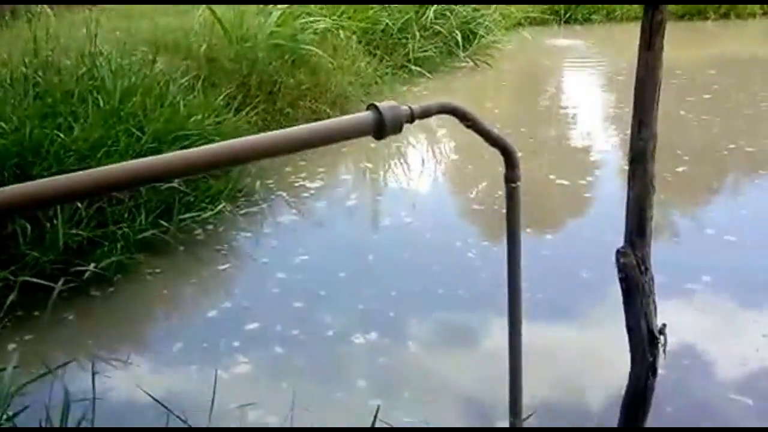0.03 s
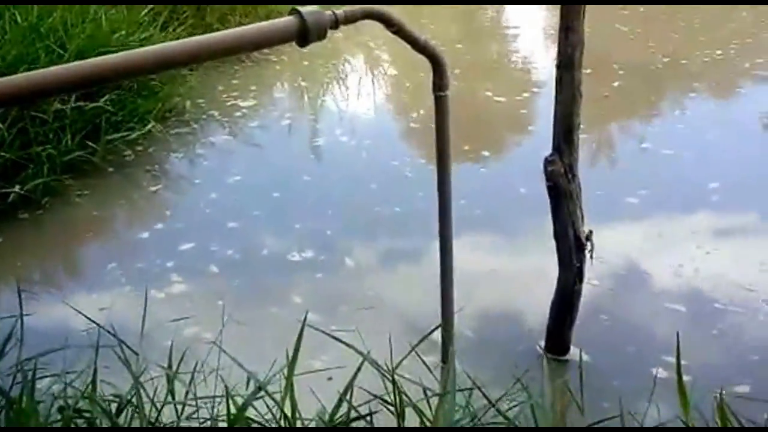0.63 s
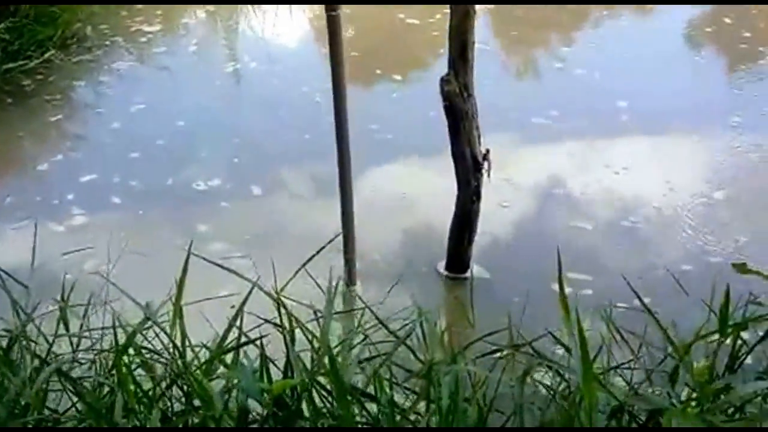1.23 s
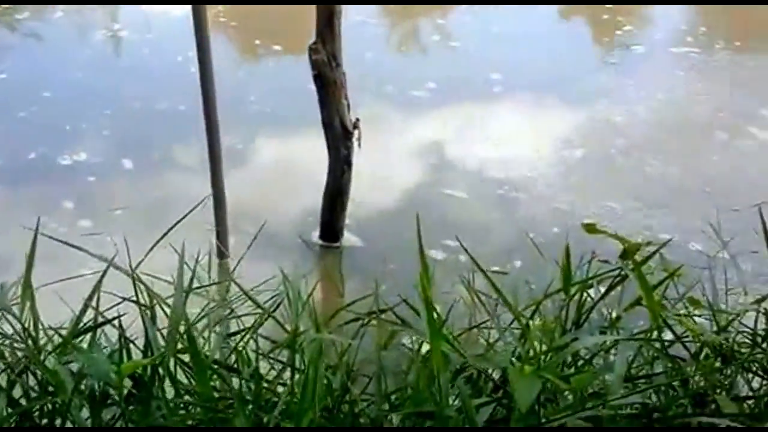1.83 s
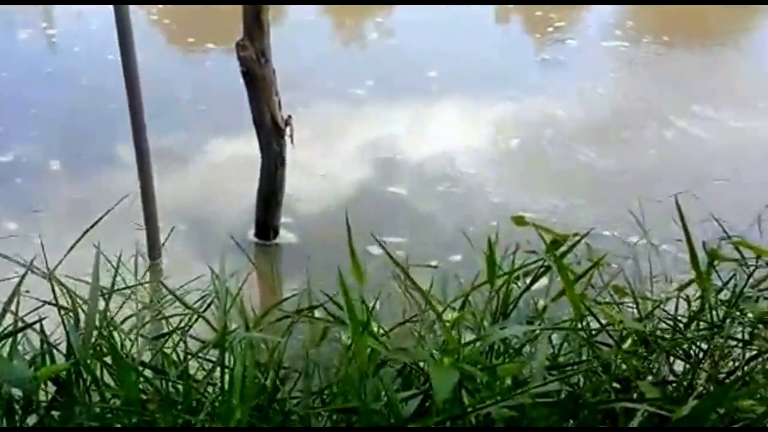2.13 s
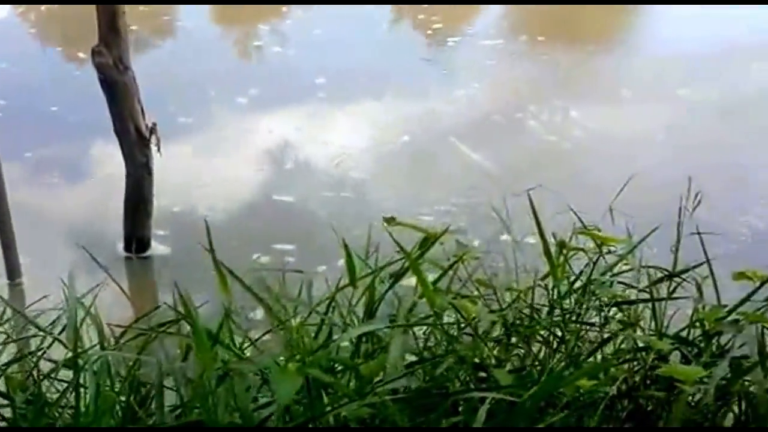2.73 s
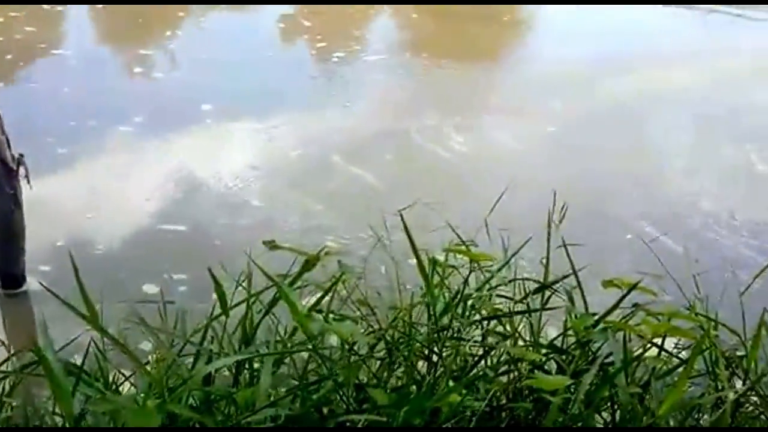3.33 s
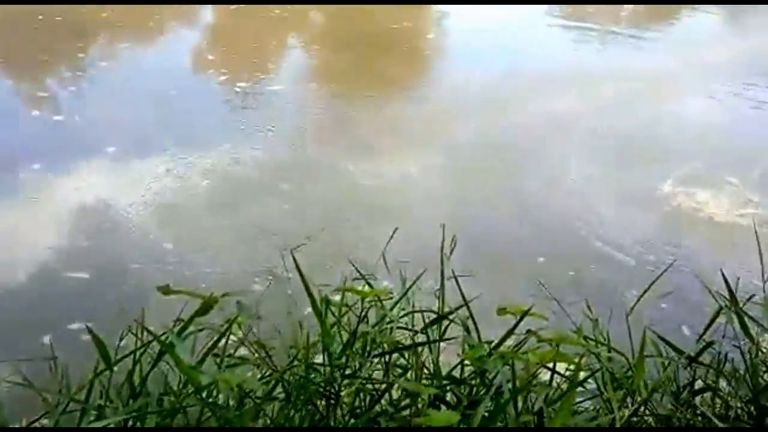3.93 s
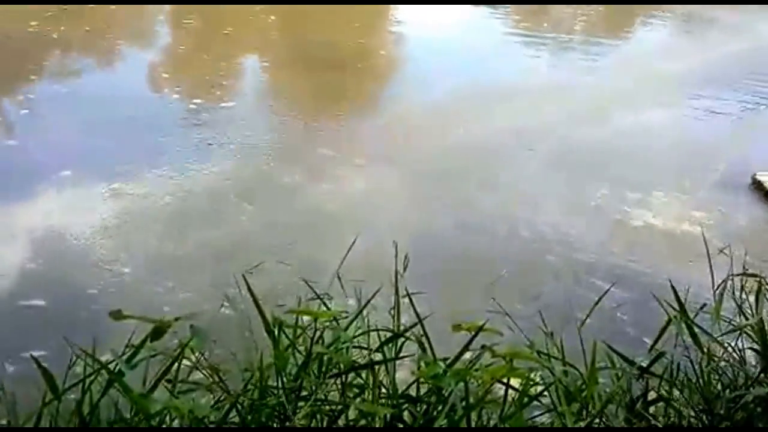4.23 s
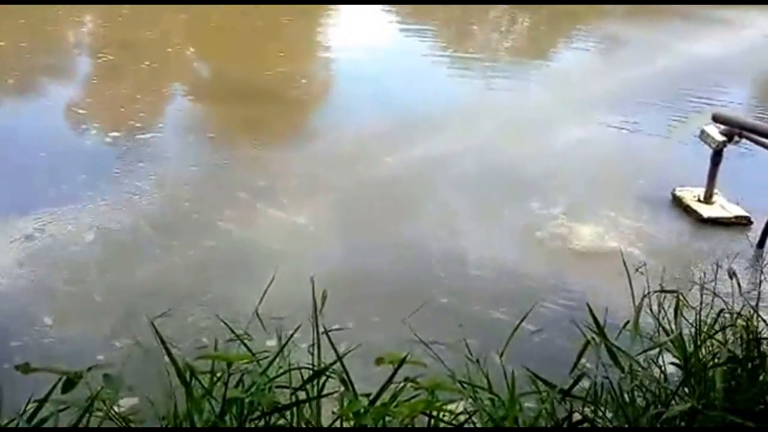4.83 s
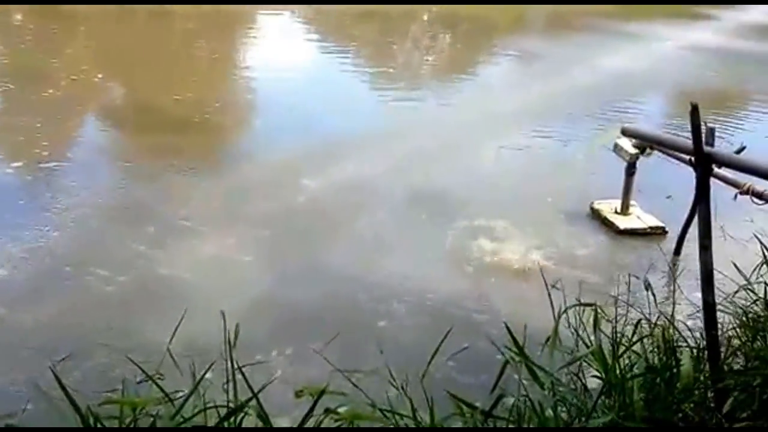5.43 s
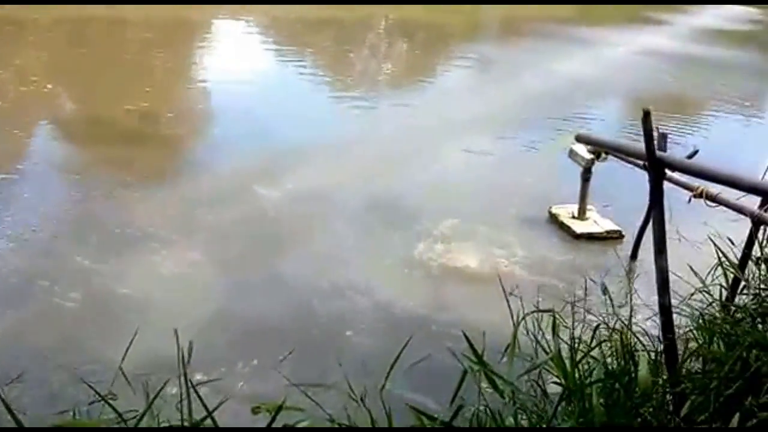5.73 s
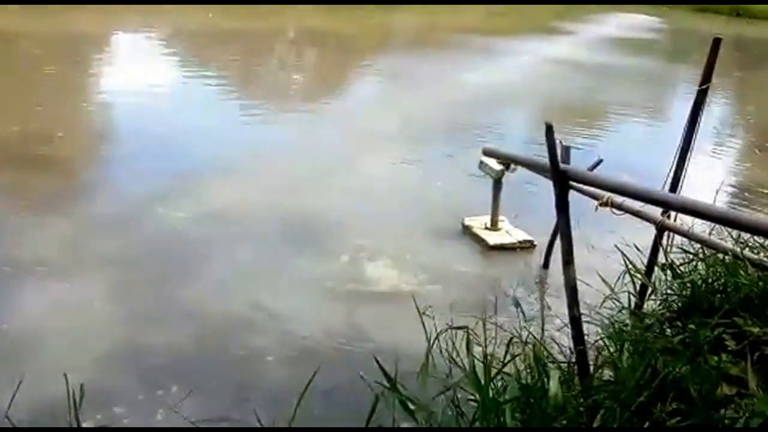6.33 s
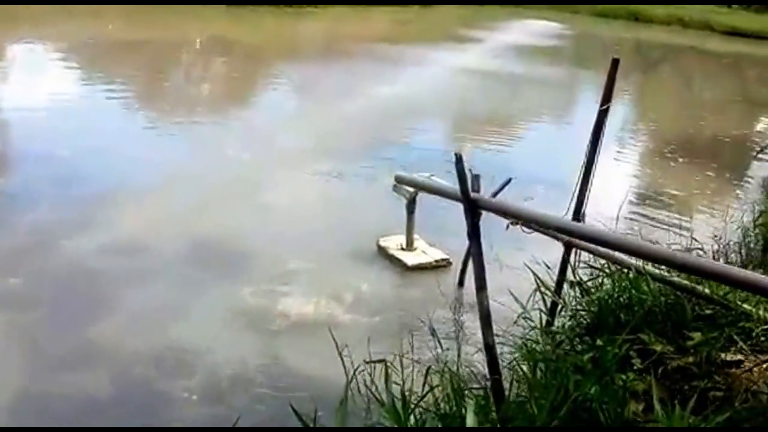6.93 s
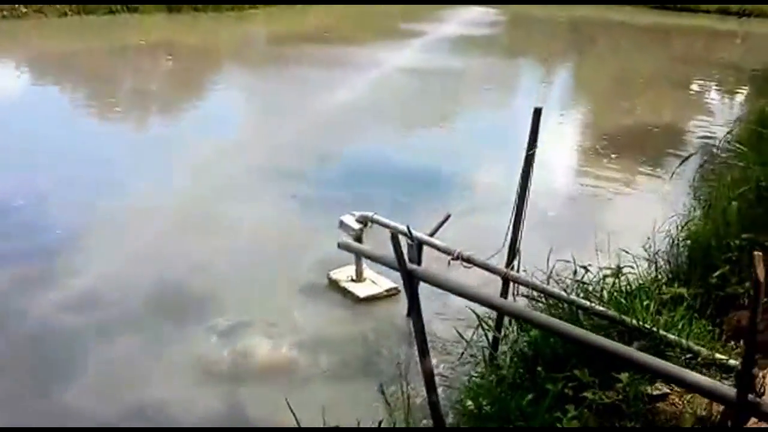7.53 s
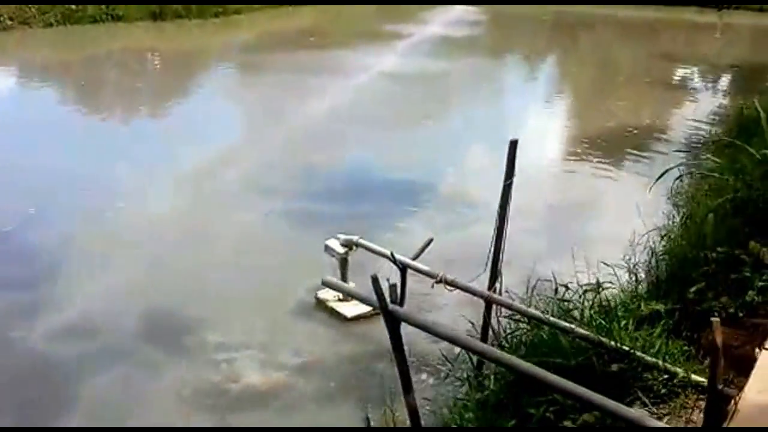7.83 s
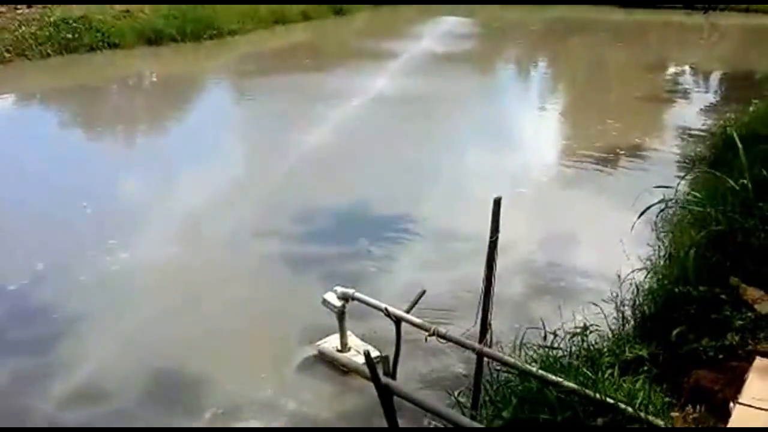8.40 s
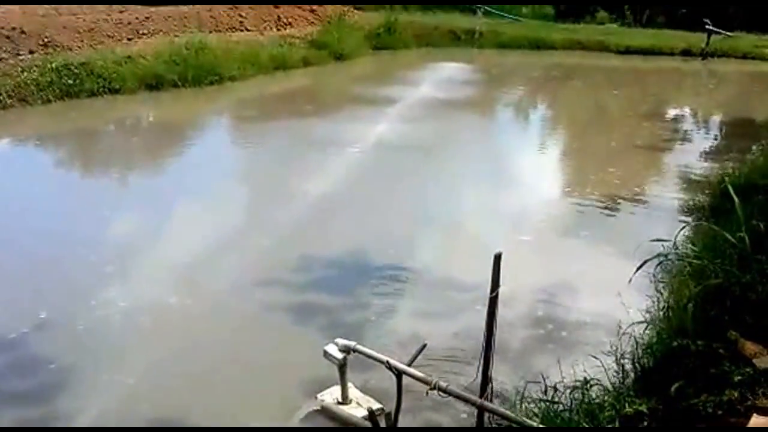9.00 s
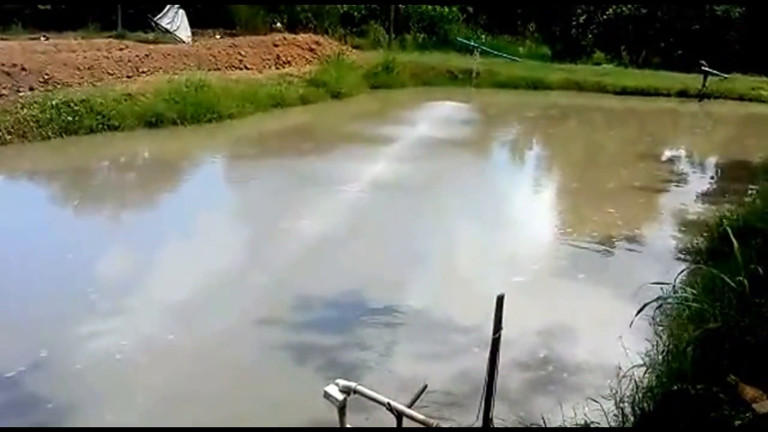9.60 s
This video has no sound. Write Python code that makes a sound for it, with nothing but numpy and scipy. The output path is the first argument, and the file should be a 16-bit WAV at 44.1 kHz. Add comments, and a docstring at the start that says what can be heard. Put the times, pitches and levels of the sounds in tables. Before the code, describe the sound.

A pump motor hums, whines and hisses beside a fish pond while its jet keeps the water gurgling and bubbling. Quick spatters of spray and scattered drops land throughout, with occasional plops and hollow swells. The microphone moves along the bank, so the water's tone slowly shifts: deep gurgling eases, fizz and splashing come forward, and the high whine dies away at the end while the low hum continues.

```python
"""An aerator's jet churns a fish pond: big bubbles gurgle and small ones wash and fizz, each
ringing briefly like a tiny bell. Spray spatters down, drops tick and slap, and a few bubbles plop.
The pump's motor hums and whines, and cooling air hisses through its cover.
The microphone pans along the bank, so sounds swell and fade and reflections slowly recolour the water."""
import sys
import numpy as np
from scipy import signal
from scipy.fft import rfft, irfft, next_fast_len
from scipy.io import wavfile
from scipy.ndimage import uniform_filter1d, map_coordinates

SR = 44100
rng = np.random.default_rng(int(sys.argv[2]) if len(sys.argv) > 2 else 0)


def dump_mix(stems):
    """Bounce the given channels to the path in sys.argv[1] as a 16-bit WAV at rate SR."""
    frames = np.atleast_2d(stems).T  # one column per channel
    limited = np.clip(frames, -1, 1)  # hard clip at full scale
    pcm = np.round(limited * 32767).astype(np.int16)
    wavfile.write(sys.argv[1], SR, pcm)


N = 426006

# Tone colours, or how strong each pitch is within a sound: pitch_hz, level_db
RUMBLE_COLOUR = [(25, -44), (45, -30), (57, -13.5), (85, -6.5), (115, -0.5), (165, 3), (215, 3), (320, -4),
                 (700, -43)]  # the jet's steady rumble
GURGLE_COLOUR = [(130, -58.5), (205, -13.5), (255, 0.7), (292, 0), (335, 0), (385, -1), (440, -4),
                 (600, -14.5), (1400, -48.5)]  # big bubbles
BOOM_COLOUR = [(260, -27.5), (288, -7), (300, 5), (309, 9), (322, 1.5), (338, -14), (380, -27.5)]  # a hollow resonance
BURBLE_COLOUR = [(250, -35.5), (380, -1.5), (520, 4.5), (610, 1), (690, 1.5), (780, -0.5), (900, -9),
                 (1400, -63)]  # medium bubbles
WASH_COLOUR = [(500, -35.5), (900, -5), (1250, -2.5), (1460, 2), (1630, -3), (1820, 1.5), (2050, -5),
               (2260, -2.5), (2650, -6.5), (3000, -12), (3500, -19.5), (4500, -19), (8000, -42)]  # small bubbles
PATCH_COLOUR = [(880, -11), (1050, 14), (1270, 22.5), (1430, 20), (1600, 21), (2000, -28)]  # one churning patch of water
JET_NOTE_COLOUR = [(1330, -19), (1430, -4), (1485, -2.5), (1540, -10), (1620, -22.5)]  # the jet's hollow note
SPRAY_COLOUR = [(2500, -12), (3700, -3), (4300, 7.5), (4750, 15), (5500, 5.5), (6500, -16), (7800, -11),
                (9400, -21), (11000, -27), (12800, -20), (14000, -28), (15500, -26)]  # droplets
FOAM_COLOUR = [(3000, -19), (4400, -4), (5200, 4.5), (6200, 3.5), (7200, -2.5), (8500, -12), (11000, -19.5),
               (12700, -9), (15000, -21)]  # fizzing foam
MIST_COLOUR = [(7500, -17), (9300, 3), (11000, -4), (13500, 2), (15000, -4)]  # the finest spray
TICK_COLOUR = [(3000, -19), (5500, 9), (8500, -5.5), (10000, -10.5), (11200, -23), (13000, -18),
               (14200, -18), (15300, -38)]  # a fine drop
SLAP_COLOUR = [(900, -9.5), (2400, 6), (3300, -2), (4300, -11), (6000, -10), (9000, -26)]  # a drop landing with a low slap
RASP_COLOUR = [(1950, -9.5), (2080, -5), (2170, -6), (2260, -3.5), (2400, -16)]  # roughness around the motor's whine
AIR_COLOUR = [(630, -24.5), (690, 4.5), (760, -1), (860, -7.5), (1600, -28), (1800, -8), (2000, -13),
              (3100, -32), (3600, -18.5), (4100, -25), (4450, -8.5), (4750, -15), (5100, -26)]  # air in the motor's cover

# How each sound grows and fades as the microphone pans: time_s, level_db
GURGLE_LEVELS = [(0, -32.5), (1.2, -33), (2.4, -31.5), (4.2, -37), (6.8, -36.5), (8.3, -39.5), (9.66, -39)]
BURBLE_LEVELS = [(0, -38), (1.1, -41), (2.5, -35), (6.7, -38.5), (8.2, -44), (9.66, -43.5)]
WASH_LEVELS = [(0, -35.5), (4.2, -37.5), (6.8, -37.5), (8.4, -38), (9.66, -42)]
SPRAY_LEVELS = [(0, -59), (1.9, -56.5), (4.6, -49.5), (7.3, -48), (9.66, -50)]
MIST_LEVELS = [(0, -82), (1.8, -84), (2.7, -68), (3.3, -67.5), (4.4, -69), (5.2, -74.5), (6.7, -74),
               (7.6, -72), (9.66, -76)]
WHINE_LEVELS = [(0.2, -45.5), (1.0, -43.5), (1.8, -46.5), (4.38, -47), (6.6, -45.5), (7.4, -49.5),
                (7.8, -57), (8.1, -51), (8.7, -55), (9.2, -72)]
OCTAVE_LEVELS = [(0, -59), (1.35, -55), (1.65, -62), (2.6, -61), (3.3, -70), (4.8, -65), (6.8, -66),
                 (7.5, -73)]  # the tone an octave above the whine

# Surges of churning that set the hollow resonance booming: time_s, level_db
BOOM_SURGES = [(0.05, -34.5), (1.3, -44), (1.9, -54), (4.6, -42), (5.82, -35.5), (7.92, -39)]
# The main clumps of spray landing: time_s, level_db, pitch_hz, length_s
SPRAY_CLUMPS = [(0.212, -39, 4600, 0.008), (0.385, -39, 4870, 0.006), (0.73, -42, 4500, 0.01),
                (1.233, -44, 5550, 0.008), (1.32, -40, 5216, 0.0066), (1.824, -39, 6010, 0.008),
                (1.962, -39, 5950, 0.0069), (1.988, -39, 5790, 0.006), (2.313, -38.5, 5285, 0.0069),
                (2.393, -41, 5240, 0.008), (2.533, -38, 4994, 0.008), (2.67, -38, 5380, 0.0059),
                (2.745, -38, 5070, 0.004), (2.835, -40, 5240, 0.009), (2.917, -40, 5100, 0.0083),
                (3.1, -39, 4992, 0.0091), (3.218, -34, 4886, 0.0057), (3.307, -35, 4850, 0.0058),
                (3.935, -34.9, 4660, 0.005), (3.965, -33, 5160, 0.0038), (4.394, -41, 4970, 0.008),
                (4.464, -34.5, 4650, 0.0055), (4.564, -35, 5027, 0.007), (4.885, -33.5, 4700, 0.0058),
                (5.051, -36, 5440, 0.008), (5.332, -35, 4840, 0.006), (5.449, -35.7, 4800, 0.007),
                (5.469, -32.3, 5010, 0.005), (5.565, -35, 4930, 0.0058), (5.664, -38, 4830, 0.011),
                (5.776, -34.5, 5230, 0.0083), (5.813, -37, 4890, 0.0039), (6.078, -34, 5040, 0.0043),
                (6.13, -32, 4960, 0.0043), (6.215, -34.9, 4750, 0.007), (6.378, -35.5, 4700, 0.0043),
                (6.422, -33, 4776, 0.0054), (6.611, -35, 4690, 0.005), (6.899, -36.5, 4960, 0.0055),
                (6.986, -34.7, 4759, 0.0047), (7.02, -38, 5120, 0.006), (7.093, -38, 4630, 0.01),
                (7.136, -34.5, 5200, 0.0063), (7.227, -39, 4840, 0.01), (7.32, -32.5, 4970, 0.0066),
                (7.589, -35.1, 4800, 0.0077), (7.777, -39.5, 4650, 0.0067), (7.881, -30, 4760, 0.0055),
                (7.96, -33, 4710, 0.011), (8.095, -35.4, 4750, 0.0055), (8.607, -39.5, 5270, 0.014),
                (8.995, -38, 5100, 0.005), (9.219, -38, 4930, 0.013), (9.329, -38, 5740, 0.006),
                (9.496, -40, 5130, 0.008)]
# The loudest ticking and slapping drops: start_s, level_db, brightness_db_per_octave
FINE_DROPS = [(0.212, -35, -12), (0.3172, -43, -2), (0.385, -40, -12), (0.6065, -41, -8), (0.73, -42, -11),
              (0.848, -42, -7), (0.9981, -40, -7), (1.231, -37, -7), (1.4769, -35, 6), (1.9106, -43, 2),
              (2.9168, -37.5, 8), (3.0969, -31, 2), (3.3712, -34, 3), (3.9719, -34, 5), (4.2248, -38, 10),
              (4.7351, -35, 2), (4.8394, -39, 2), (5.031, -34, -1), (5.244, -41, 11), (5.3263, -42, -2),
              (5.466, -35, -4), (5.6809, -36, 0), (6.3285, -40, 1), (6.349, -40, 2), (6.7555, -40, 2),
              (7.0913, -42, 0), (7.3173, -26.5, -2), (8.6128, -37, 3), (9.4948, -33, -4), (9.5711, -37, 6)]
SLAPPING_DROPS = [(0.2097, -31, -2), (0.381, -31, 1), (0.5586, -30.5, -1), (0.615, -32, 0), (0.7267, -28.5, 0),
                  (0.8429, -30, -1), (1.137, -31, -4), (1.1992, -29, -1.5), (1.91, -30, -2), (2.826, -34, -5),
                  (3.092, -29, -4), (5.041, -31.5, 2), (5.77, -28, 1.5), (7.615, -37, 1), (8.43, -36, -5),
                  (9.176, -33, -10), (9.57, -31, -8)]
# Single larger bubbles: start_s, level_db, pitch_hz, length_cycles, slap_strength
SINGLE_BUBBLES = [(1.136, -19, 417, 14, 0.38), (2.826, -19, 2370, 36, 0.3), (3.18, -21, 1510, 30, 0.5),
                  (4.496, -18, 1800, 18, 0.3), (4.4984, -15.5, 1660, 32, 0.15), (5.704, -21, 1775, 34, 0.5),
                  (5.77, -22, 1600, 30, 0.8), (6.003, -23, 970, 22, 0.5), (7.048, -25.5, 1010, 22, 0.85),
                  (7.171, -23, 1520, 31, 0.7), (7.3262, -16.5, 1300, 9, 0.7), (8.059, -25, 850, 25, 0.3),
                  (8.3, -29, 834, 22, 0.5), (8.475, -28, 680, 18, 0.5), (9.035, -15.5, 1650, 15, 0.15),
                  (9.0355, -25, 750, 7.7, 0.4), (9.049, -21, 1100, 13, 0.4), (9.057, -29, 900, 13, 0.8),
                  (9.176, -27.5, 880, 14, 0.81), (9.1918, -25.5, 960, 10, 0.9),
                  (9.211, -26.5, 1690, 30, 0.67), (9.627, -29, 790, 20, 0.57)]

# The motor's tones: pitch_hz, level_db
HUM_TONES = [(116.3, -0.5), (120.1, -8), (178, -11.5), (707.2, -12.5), (753.7, -17.5)]  # from the shaft and the mains power
SIDE_TONES = [(2084, -15), (2121.7, -34), (2199.1, -10.5), (2953.7, -33)]  # beside the whine, with levels relative to it
CASING_TONES = [(3794.2, -10), (3910, -12), (3992, -14), (4049.6, -3.5), (4167.5, -12), (4249, -9)]  # thin tones from the casing
# The whine sags slightly towards the end: time_s, pitch_hz
WHINE_PITCH = [(0, 2163.7), (2, 2163.3), (6.4, 2162.8), (7.7, 2160.3), (9.66, 2159.8)]

# Reflections whose paths keep changing: time_s, delay_ms, strength
NEAR_ECHO = [(0, 0.62, 0.27), (1.2, 0.42, 0.1), (2.3, 0.66, 0.2), (3.5, 0.36, 0.21), (5.2, 0.42, 0.14),
             (6.7, 0.47, 0.18), (7.3, 0.41, 0.28), (8.1, 0.73, 0.17), (9.66, 0.88, 0.3)]  # from close by
WATER_ECHO = [(0, 3.1, 0), (1.5, 2.11, 0.12), (2.4, 1.9704, 0.15), (3.5, 1.85, 0.12), (4.4, 1.8, 0.01),
              (5.2, 1.35, 0.1), (6.6, 1.26, 0.15), (7.5, 1.56, 0.02), (8.3, 1.92, 0), (9.2, 2.7, 0.03),
              (9.66, 2.34, 0.05)]  # off the pond's surface
# Two dips in the treble that slide as the microphone turns: time_s, centre_hz, depth_db
LOWER_TREBLE_DIP = [(0, 10500, 1.5), (1.5, 9300, 6), (2.6, 8400, 8), (3.7, 7500, 6), (5, 7060, 6),
                    (6, 7100, 5), (6.8, 6700, 4.5), (7.6, 6253, 1.5), (9.66, 5951, 0)]
UPPER_TREBLE_DIP = [(0, 14200, 3), (1.3, 14200, 2), (1.7, 14700, 0.5), (2.7, 14000, 10), (4, 12900, 7),
                    (5, 11900, 3.5), (6.2, 11200, 5), (7.5, 10700, 5), (9.66, 10800, 5)]

# When the microphone faces each source: start_s, end_s, fade_s, facing_db, away_db
JET_VIEW = (6.5, 8, 1.5, -44, -53.5)
PATCH_VIEW = (7.5, 8.6, 1.04, -41, -55)
FOAM_VIEW = (3.5, 1, 4.5, -48, -56.5)  # start after end: never fully faced
SLAP_VIEW = (-7.5, 2, 6.5, -36.5, -39.5)
CASING_VIEW = (4.6, 7.5, 2.5, -57, -63)
AIR_VIEW = (0, 0.87, 2, -43, -59)


def gurgling():
    """Big bubbles gurgle and burble over the jet's rumble and set a hollow resonance booming."""
    t = np.arange(N) / SR
    big = bubbles(per_s=400, low_hz=202.7, high_hz=489, cycles=27, spread_db=1.5, samples=2600)
    gurgle = amp(curve(GURGLE_LEVELS)) * churn(big, GURGLE_COLOUR, blur_db=0.5)
    surges = sum(amp(db) * np.exp(-((t - s) / 0.092) ** 2) for s, db in BOOM_SURGES)
    boom = (amp(-45) + surges) * noise(BOOM_COLOUR)
    medium = bubbles(per_s=400, low_hz=374.7, high_hz=903, cycles=37.6, spread_db=0.5, samples=2400)
    burble = amp(curve(BURBLE_LEVELS)) * churn(medium, BURBLE_COLOUR, blur_db=0)
    rumble = amp(-43.5) * noise(RUMBLE_COLOUR)
    return gurgle + boom + burble + rumble


def froth():
    """Small bubbles wash around the jet's hollow note; spray, foam and mist crackle in quick surges."""
    surge = wobble(per_s=23)
    cloud = bubbles(per_s=1200, low_hz=779, high_hz=3395, cycles=24.7, spread_db=2.5, samples=800)
    wash = amp(curve(WASH_LEVELS) + 0.34 * surge) * churn(cloud, WASH_COLOUR, blur_db=2)
    cloud = bubbles(per_s=800, low_hz=990, high_hz=1660, cycles=19.82, spread_db=-0.7, samples=700)
    patch = amp(faced(*PATCH_VIEW)) * churn(cloud, PATCH_COLOUR, blur_db=5)
    cloud = bubbles(per_s=900, low_hz=3580, high_hz=11900, cycles=36, spread_db=4.5, samples=360)
    spray = amp(curve(SPRAY_LEVELS) - 1) * churn(cloud, SPRAY_COLOUR, blur_db=-3)
    cloud = bubbles(per_s=410, low_hz=7500, high_hz=15100, cycles=15, spread_db=5, samples=100)
    mist = amp(curve(MIST_LEVELS)) * churn(cloud, MIST_COLOUR, blur_db=-2)
    cloud = bubbles(per_s=1300, low_hz=4070, high_hz=9130, cycles=66, spread_db=2, samples=200)
    foam = amp(faced(*FOAM_VIEW)) * churn(cloud, FOAM_COLOUR, blur_db=-2.5)
    jet_note = amp(faced(*JET_VIEW)) * noise(JET_NOTE_COLOUR)
    return wash + patch + jet_note + amp(2 * surge) * (spray + foam + mist)


def spatters():
    """Spray lands in clumps: each is a few sharp droplet splashes with tiny bubbles ringing among them."""
    usual_hz, usual_length_s = 4770, 0.006
    droplets_per_s, splash_decay_s = 1100, 0.00066
    out, t = np.zeros(N + SR), np.arange(SR // 16) / SR
    landings = shower(per_s=15, uneven=0.7, db=curve(SPRAY_LEVELS) + 8, spread_db=2, count=260)
    lesser_clumps = [(s, db, usual_hz, usual_length_s) for s, db in landings]
    for time_s, db, hz, length_s in list(SPRAY_CLUMPS) + lesser_clumps:
        count = 2 + int(droplets_per_s * length_s)
        lag_s = rng.gamma(2, 0.42 * length_s, (count, 1))
        strength = amp(rng.normal(0, 1.5, (count, 1)))
        pitch_hz = hz * np.exp(rng.normal(0, 0.11, (count, 1)))
        strikes = np.bincount((lag_s[:, 0] * SR).astype(int), strength[:, 0], len(t))[:len(t)]
        fading = signal.lfilter([1], [1, -np.exp(-1 / (SR * splash_decay_s))], strikes)
        shifted = [(f * hz / usual_hz, level) for f, level in SPRAY_COLOUR]
        colour = tilted(shifted, rng.normal(-1.2, 0.9))
        splashes = coloured(fading * rng.standard_normal(len(t)), colour)
        age_s = np.maximum(t - lag_s, 0)
        fade_in = 1 - np.exp(-age_s * pitch_hz / 0.46)
        ringing = (strength * fade_in * ring(age_s, pitch_hz, cycles=65, rise=0.099)).sum(0)
        clump = unit(unit(splashes) + 0.7 * unit(ringing)) * np.sqrt(length_s / t[-1])
        start = max(round((time_s - 0.85 * length_s) * SR), 0)  # centres the clump on time_s
        out[start:][:len(t)] += amp(db - 2) * clump
    return out[:N]


def drops():
    """Fine drops tick brightly on the pond; the landings also slap at a lower pitch, most of all in the first
    two seconds."""
    fine = shower(per_s=11, uneven=0.7, db=-50.5, spread_db=5.5, count=160)
    heavy = shower(per_s=5, uneven=0.76, db=faced(*SLAP_VIEW), spread_db=0.5, count=60)
    ticks = impacts(FINE_DROPS, fine, TICK_COLOUR, fade_s=0.012, attack_s=0.00056)
    slaps = impacts(SLAPPING_DROPS, heavy, SLAP_COLOUR, fade_s=0.039, attack_s=0.0023)
    return amp(3.5) * (ticks + slaps)


def impacts(loudest, lesser, colour, fade_s, attack_s):
    """Each drop hits the surface with a short burst of noise; the loudest have their own brightness."""
    out, t = np.zeros(N + SR), np.arange(SR // 16) / SR
    for start_s, db, brightness in list(loudest) + [(s, db, 0) for s, db in lesser]:
        burst = rng.standard_normal(len(t)) * amp(-60 * t / fade_s) * (1 - np.exp(-t / attack_s))
        hit = coloured(burst, tilted(colour, brightness))
        out[round(start_s * SR):][:len(t)] += amp(db) * hit / np.abs(hit).max()
    return out[:N]


def plops():
    """Single larger bubbles pinch off and ring, with a wet slap near their own pitch."""
    out, t = np.zeros(N + SR), np.arange(SR // 16) / SR
    for start_s, db, hz, cycles, slap_strength in SINGLE_BUBBLES:
        burst = rng.standard_normal(len(t)) * amp(-60 * t * hz / cycles)
        slap = coloured(burst, [(0.63 * hz, -8), (hz, 0), (1.51 * hz, -9)])
        slap *= slap_strength / np.abs(slap).max()
        bubble = ring(t, hz, cycles, rise=0.018) * (1 - np.exp(-t * hz / 0.54))
        out[round(start_s * SR):][:len(t)] += amp(db) * (bubble + slap)
    return out[:N]


def pump():
    """The shaft and mains power hum; slots in the spinning rotor whine as they pass the fixed coils."""
    whine_hz, whine_db = 2163, curve(WHINE_LEVELS)
    drift = curve(WHINE_PITCH) / whine_hz - 1 + 0.0002 * wobble(per_s=6)
    hum = amp(-46.5) * tones(HUM_TONES, drift, flutter_db=0.1)
    whine = amp(whine_db + 3) * tones([(whine_hz, 0)] + list(SIDE_TONES), drift, flutter_db=0.5)
    rasp = amp(whine_db - 5.5) * noise(RASP_COLOUR)
    octave = amp(curve(OCTAVE_LEVELS)) * tones([(2 * whine_hz, 0)], drift, flutter_db=1.5)
    casing = amp(faced(*CASING_VIEW)) * tones(CASING_TONES, drift, flutter_db=2.5)
    return hum + whine + rasp + octave + casing


def cooling_air():
    """Cooling air hisses through the motor's cover, which rings at a few pitches."""
    return amp(faced(*AIR_VIEW)) * noise(AIR_COLOUR)


def reflected(x, path, smooth_samples):
    """A slightly late copy joins the sound, boosting some pitches and weakening others."""
    delay_ms, strength = curve(path), curve(path, column=2)
    late = map_coordinates(x, [np.arange(N) - delay_ms * SR / 1000])
    dull = uniform_filter1d(late, smooth_samples)  # a rough surface scatters the treble
    return (x + strength * dull) / np.sqrt(1 + strength ** 2)


def treble_dips(x, width_hz=1040):
    """Two narrow bands of the treble sink, sliding in pitch as the microphone pans."""
    hz, t, spectrum = signal.stft(x, SR, nperseg=256)
    for dip in (LOWER_TREBLE_DIP, UPPER_TREBLE_DIP):
        time_s, centre_hz, depth_db = np.transpose(dip)
        band = np.exp(-((hz[:, None] - np.interp(t, time_s, centre_hz)) / width_hz) ** 2)
        spectrum *= amp(-np.interp(t, time_s, depth_db) * band)
    return signal.istft(spectrum, SR, nperseg=256)[1][:N]


def ring(t, hz, cycles, rise):
    """One bubble: a fading tone whose pitch climbs as it nears the surface."""
    age = t * hz / cycles
    return np.sin(2 * np.pi * hz * t * (1 + rise * age)) * amp(-60 * age)


def bubbles(per_s, low_hz, high_hz, cycles, spread_db, samples):
    """A cloud of bubbles, each with a random start, pitch and strength."""
    count = min(int(per_s * N / SR), 5000000 // samples)
    when, pitch, strength = rng.random((count, 3)).T[:, :, None]
    hz = low_hz * (high_hz / low_hz) ** pitch
    gain = amp(-spread_db * np.log(np.maximum(strength, 0.01))) * hz / low_hz
    waves = gain * ring(np.arange(samples) / SR, hz, cycles, rise=0.17)
    positions = (when * N).astype(int) + np.arange(samples)
    return unit(np.bincount(positions.ravel(), waves.ravel(), N)[:N])


def churn(cloud, colour, blur_db):
    """Distinct bubbles stand out over the blur of countless others."""
    return unit(unit(coloured(cloud, colour)) + amp(blur_db) * noise(colour))


def shower(per_s, uneven, db, spread_db, count):
    """Water lands at an uneven pace, scattered around a level. Gives rows of time_s, level_db."""
    gap, strength = rng.standard_normal((2, count))
    times = np.cumsum(np.exp(uneven * gap - uneven ** 2 / 2)) / per_s
    level = np.broadcast_to(db, N)
    return [(s, level[int(s * SR)] + spread_db * z) for s, z in zip(times, strength) if s < N / SR]


def tones(rows, drift, flutter_db):
    """Motor tones drift together with its speed; each flutters in the outdoor air."""
    clock = np.cumsum(1 + drift) / SR
    out = np.zeros(N)
    for hz, db in rows:
        gain = amp(db + flutter_db * wobble(per_s=5))
        out += gain * np.sin(2 * np.pi * (hz * clock + rng.random()))
    return np.sqrt(2) * out


def faced(start_s, end_s, fade_s, facing_db, away_db):
    """A source's level in dB as the microphone turns towards it and away again."""
    t = np.arange(N) / SR
    turned = np.clip(np.maximum(start_s - t, t - end_s) / fade_s, 0, 1)
    return facing_db + (away_db - facing_db) * turned


def coloured(x, colour):
    """Filter a sound to a tone colour, fading steeply beyond its lowest and highest pitch."""
    size = 2 * next_fast_len(len(x) // 2 + 4096)
    hz, db = np.transpose(colour)
    octave, points = np.log2(np.fft.rfftfreq(size, 1 / SR) + 1), np.log2(hz)
    octaves_outside = np.abs(octave - np.clip(octave, points[0], points[-1]))
    gain = amp(np.maximum(np.interp(octave, points, db) - 36 * octaves_outside, -110))
    # fold the filter in time so that it rings only after a hit, never before
    folded = irfft(np.log(gain))
    folded[1:size // 2] *= 2
    folded[size // 2 + 1:] = 0
    return irfft(rfft(x, size) * np.exp(rfft(folded)), size)[:len(x)]


def tilted(colour, db_per_octave):
    """Make a tone colour brighter or duller."""
    return [(hz, db + db_per_octave * np.log2(hz / colour[0][0])) for hz, db in colour]


def noise(colour):
    """Steady noise with the given tone colour."""
    return unit(coloured(rng.standard_normal(N), colour))


def wobble(per_s):
    """A smooth curve through per_s random values a second."""
    return map_coordinates(rng.standard_normal(int(N * per_s / SR) + 4), [np.arange(N) * per_s / SR])


def curve(rows, column=1):
    """Join a table's points in time with straight lines, one value per sample."""
    columns = np.transpose(rows)
    return np.interp(np.arange(N) / SR, columns[0], columns[column])


def amp(db):
    """Turn decibels into a multiplier."""
    return 10 ** (np.asarray(db) / 20)


def unit(x):
    """Scale a sound to an average (rms) level of 1."""
    return x / np.sqrt(np.mean(x ** 2) + 1e-20)


def scene():
    """The churning water, its splashes and the pump's motor, in one channel."""
    churning = reflected(gurgling() + froth(), NEAR_ECHO, smooth_samples=7)
    churning = reflected(churning, WATER_ECHO, smooth_samples=9)
    water = treble_dips(churning + spatters() + drops()) + plops()
    return (water + pump() + cooling_air())[None]


def record(dry):
    """The microphone picks up nothing above its highest pitch."""
    top_hz = 15750
    return irfft(rfft(dry) * (np.fft.rfftfreq(N, 1 / SR) < top_hz), N)


dry = scene()
out = record(dry)
dump_mix(out)
```